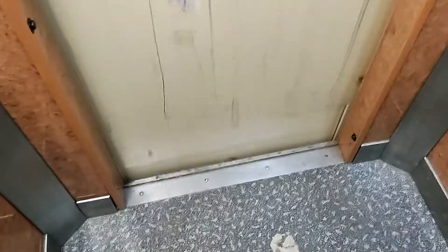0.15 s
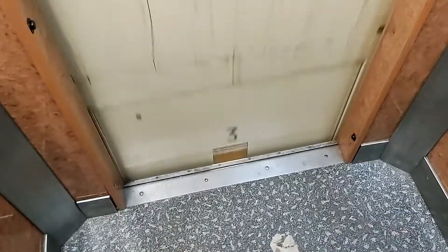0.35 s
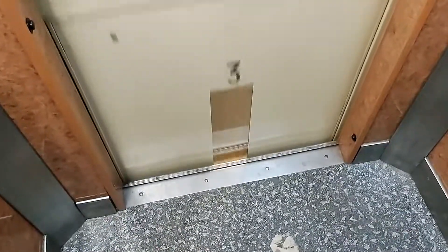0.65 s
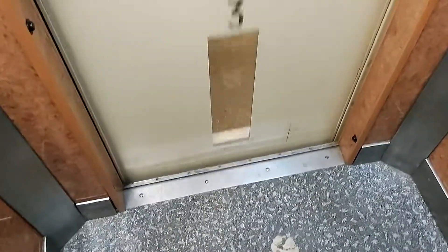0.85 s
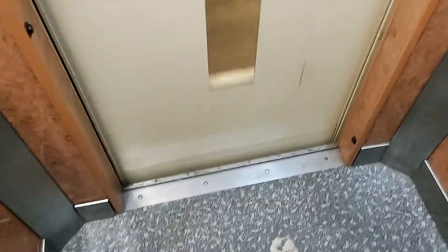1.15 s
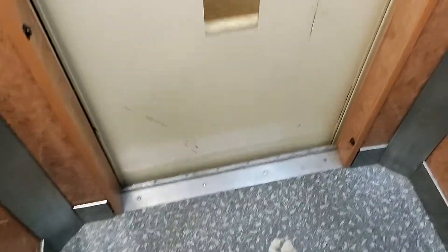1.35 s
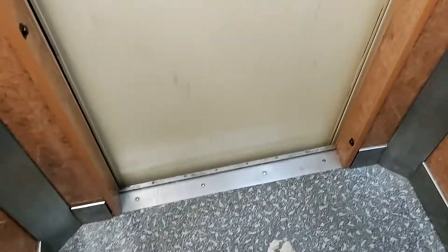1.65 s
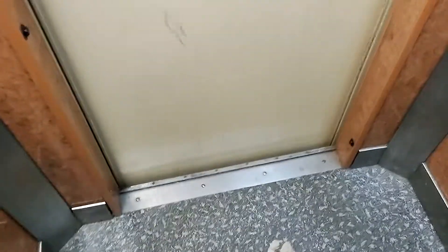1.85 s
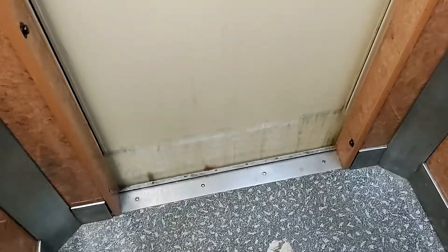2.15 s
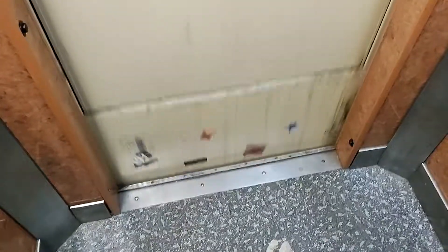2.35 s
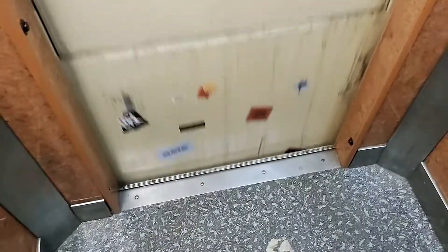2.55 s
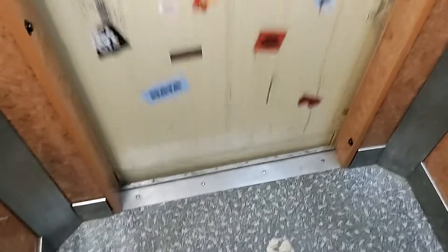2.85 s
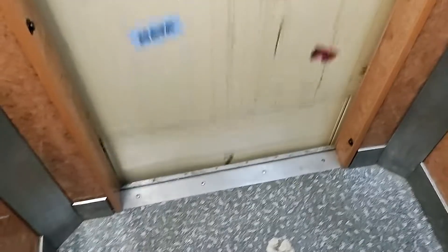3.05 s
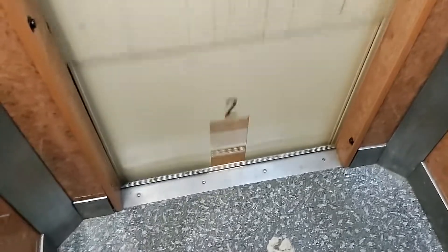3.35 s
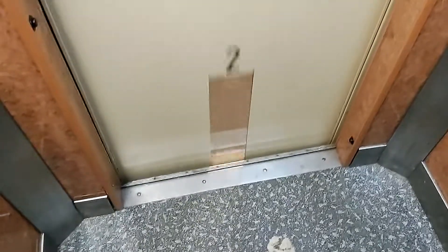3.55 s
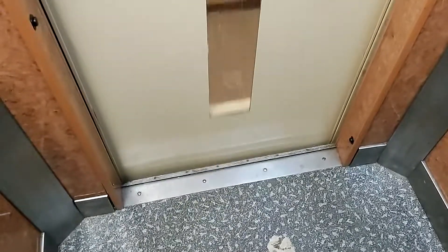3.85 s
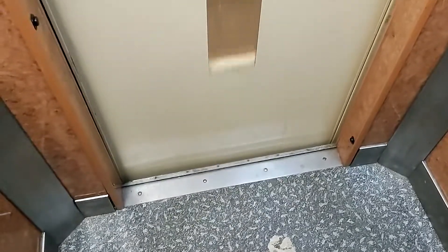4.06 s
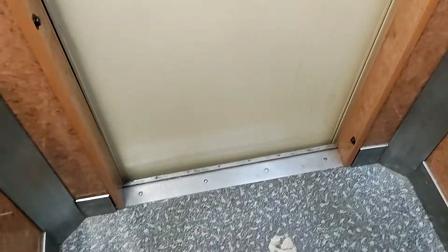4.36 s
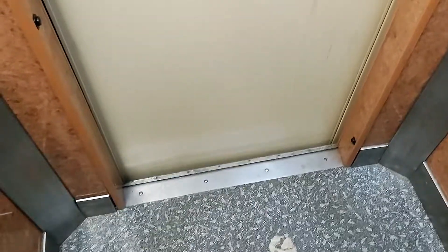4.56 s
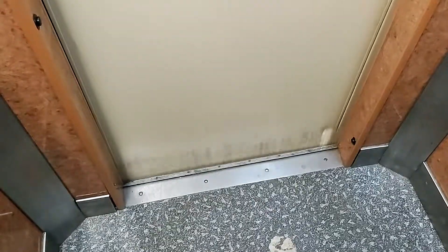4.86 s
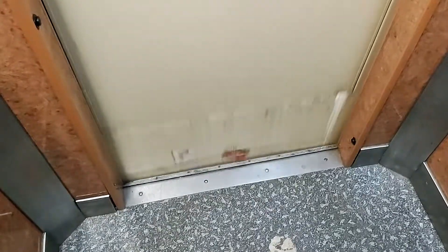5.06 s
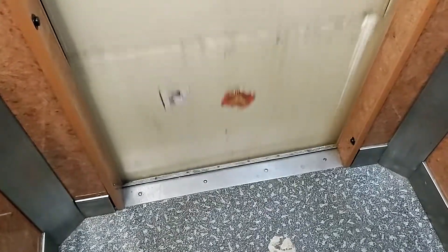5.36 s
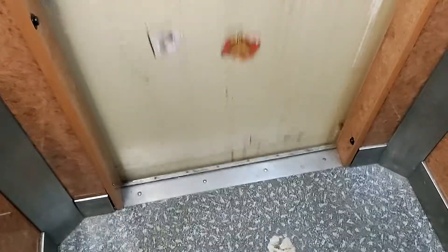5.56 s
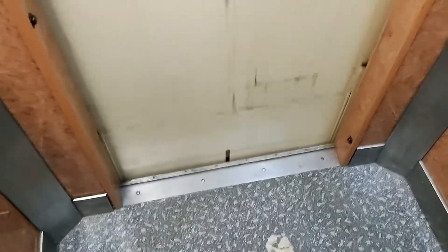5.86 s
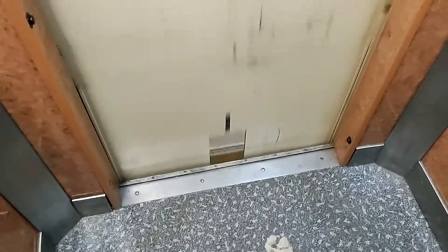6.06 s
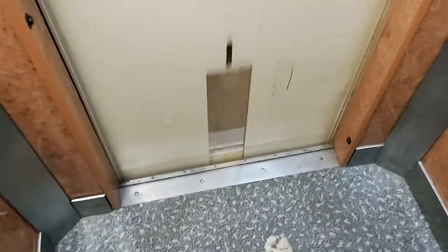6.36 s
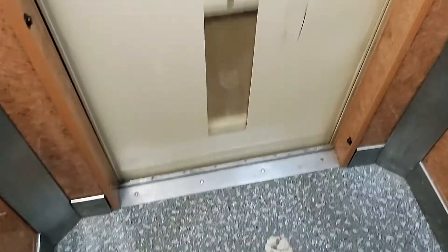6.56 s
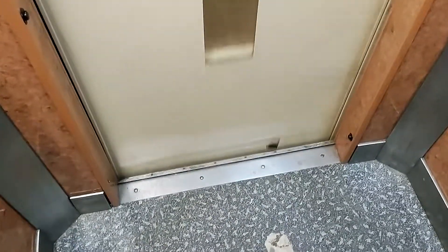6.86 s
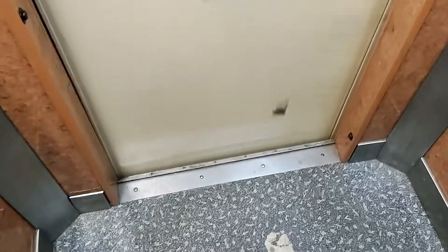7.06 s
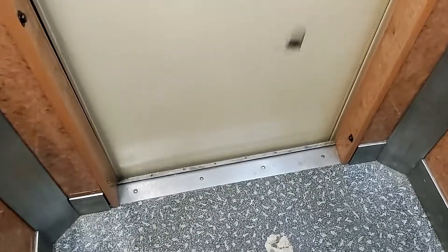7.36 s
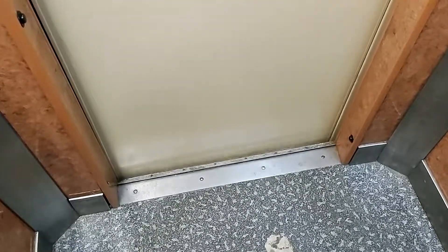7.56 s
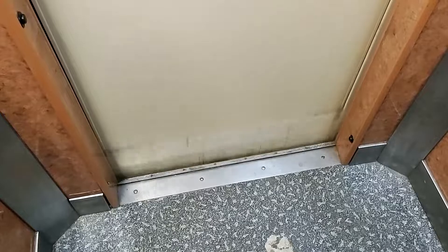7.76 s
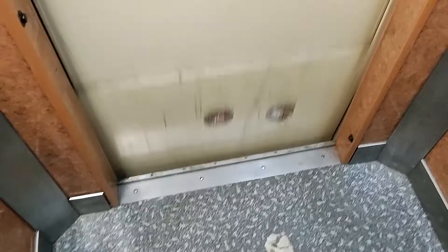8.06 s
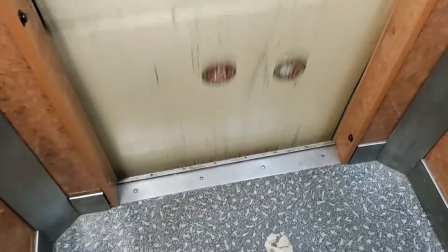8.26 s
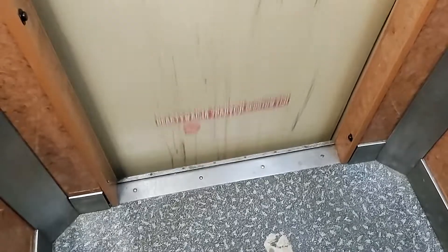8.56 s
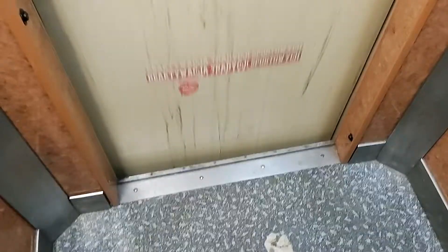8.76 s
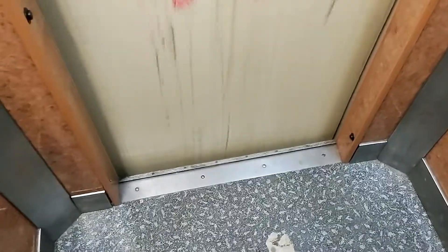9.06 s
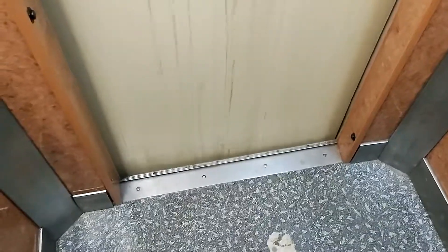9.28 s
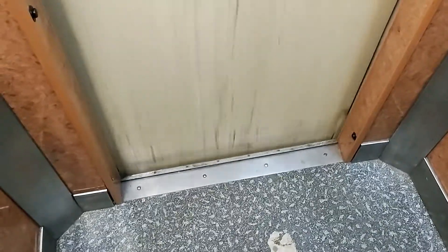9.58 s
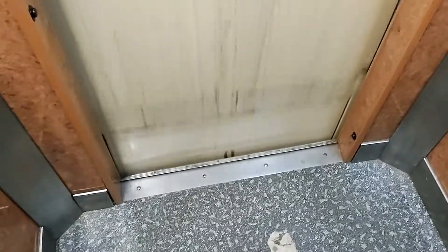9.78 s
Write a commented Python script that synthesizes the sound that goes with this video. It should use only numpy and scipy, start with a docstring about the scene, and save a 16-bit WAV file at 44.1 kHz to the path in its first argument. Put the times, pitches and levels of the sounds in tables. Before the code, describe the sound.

An old passenger lift is travelling throughout, heard close from inside the car: a low, slightly wavering motor hum, a soft rumble and a faint hiss from the rails. Over this, door gear knocks against the passing landings, each blow rattling, ringing the panels and echoing briefly in the shaft. One loud knock comes at 0.4 seconds, followed by light, scattered taps and a faint, thin whine from the rails around 1 to 2.5 seconds. Moderate knocks fall at 4.3 and 5.1 seconds, then loud ones at 5.6, 5.9, 7.5 and 7.8. Faint, short scrapes slide by between 7.3 and 8.4 seconds, ending with a small click. From 8.7 seconds comes the busiest part, a rapid run of loud clattering blows. Around 9.3 seconds a hollow door panel is struck and briefly scraped, and duller thuds continue until nearly 10 seconds.

```python
"""Door gear knocks, scrapes and clatters against each landing as an old lift car runs down its shaft.
Every blow rings the door panels, thumps the car wall and echoes on in the shaft. At the last landing
a hollow door leaf is struck and scraped. Underneath, the geared motor hums through ropes and rails,
and the guide shoes that hold the car on its rails rumble and hiss."""
import sys
import numpy as np
from scipy import signal
from scipy.io import wavfile

SR = 44100
rng = np.random.default_rng(int(sys.argv[2]) if len(sys.argv) > 2 else 0)


def generate_wav(sig):
    """Save sig (samples, or channels by samples) to the path in sys.argv[1] as 16-bit PCM at SR."""
    pcm = np.round(np.clip(np.atleast_2d(sig).T, -1, 1) * 32767).astype(np.int16)
    wavfile.write(sys.argv[1], SR, pcm)


N = 437472

# blows of the door gear: (time [s], level [dB], body [dB], treble [dB], fade time [s], contact time [s])
KNOCKS = [(0.084, -51.5, -2, -29, .14, .016), (0.3142, -40, -6.5, -11.5, .11, .018),
          (0.4337, -21.5, -7.5, -17.5, 0.35, 0.01), (0.9794, -51, 2, -26, .34, 0.061),
          (1.0789, -47.5, -2, -15, .095, 0.0085), (2.1581, -43, -0.5, -28, 0.12, 0.015),
          (2.7044, -42, -2, -34, 0.16, .012), (2.989, -51.5, 4, -25, .2, 0.019),
          (3.021, -49.5, 0, -24, 0.16, .02), (3.4768, -43, -4.5, -30, .19, 0.02),
          (3.532, -47, -7, -8.5, .15, .013), (4.008, -52, 1, -39, .08, .012),
          (4.2699, -32, -7.5, -44, 0.16, .013), (4.327, -32.5, -14, -15.5, 0.25, 0.011),
          (4.4359, -43.5, -0.5, -47, 0.11, 0.013), (4.621, -50, 0, -32, .18, .016),
          (4.6682, -43, -1.5, -39, .11, 0.035), (4.696, -42, -18, -9, .13, 0.019),
          (5.1286, -33, -6.5, -24, .11, 0.017), (5.419, -47, -2, -23, 0.12, 0.021),
          (5.5115, -51, 7, -27, .08, .0097), (5.6144, -36, 0, -8.5, .15, .023),
          (5.6304, -18.5, -4, -20.5, 0.29, 0.0028), (5.863, -29.5, -8, -14, .15, .011),
          (5.8862, -18.5, -5, -20.5, 0.22, 0.013), (6.249, -47, 1.5, -46, 0.083, 0.017),
          (7.215, -49, 4, -34, .088, .0084), (7.3596, -39, -12, -11, .12, 0.013),
          (7.5356, -41, -5, -7, .18, .02), (7.5521, -20, -7, -16.5, 0.38, 0.014),
          (7.822, -31.5, -8, -12, .2, 0.05), (7.8491, -17.5, -6, -18.5, 0.37, 0.021),
          (8.016, -33, -8, -12, 0.13, 0.008), (8.0847, -30.5, -6.5, -12.5, 0.12, 0.008),
          (8.464, -38.5, -6, -33, .14, 0.022), (8.478, -39, -17, -14, .18, .016),
          (8.51, -40.5, -14, -28, 0.13, .015), (8.6299, -36, -9, -21, .1, .0091),
          (8.7346, -21.5, -8, -20.5, 0.53, 0.021), (8.786, -21.5, -8, -30, 0.13, .011),
          (8.8799, -18, -6.5, -23.5, 0.14, 0.017), (9.019, -17, -8.5, -23, 0.22, .012),
          (9.1277, -17.5, -7.5, -26, 0.17, 0.014), (9.183, -18.5, -5.5, -34, 0.33, 0.021),
          (9.330, -18.5, 1, -55, 0.26, 0.05), (9.3847, -19, -15, -49, 0.22, 0.027),
          (9.43, -16, -5.5, -28.5, 0.29, 0.015), (9.621, -33, 8.5, -56, 0.55, 0.038),
          (9.6794, -37, 8, -40, .15, .018), (9.7625, -23.5, 2.5, -38, .32, 0.022),
          (9.829, -29.5, -2.5, -37, 0.57, .016)]
# basic tone colour of a blow: (frequency [Hz], level [dB])
BLOW_SPECTRUM = [(88, -33), (150, -14.5), (466, -8.5), (534, -14.5), (589, -6.5), (979, -5), (1080, -1.5),
                 (1450, -9), (1660, -3.5), (2400, -8), (5910, -30), (13200, -46.5), (16000, -53)]
# how alike left and right sound: (frequency [Hz], likeness [-1 to 1])
LIKENESS = [(60, 0.99), (100, 1), (160, 0.61), (240, 0.57), (340, 0.96), (550, 0.51), (900, -0.18),
            (1400, -0.3), (2500, 0.03), (7000, -0.057)]
# where hum and noise sit between the ears: (frequency [Hz], left over right [dB])
BALANCE = [(60, 0.0), (180, 1.5), (550, 1.5), (1650, -0.5), (4970, -2), (15000, 0.5)]


def door_knocks(bands, rattle):
    """Door gear hits the landings: each blow is a rattling burst of noise that rings the panels."""
    bursts = sum(from_db(at_hz(BLOW_SPECTRUM, hz)) * blow_envelope(hz) * rattle * noise
                 for hz, noise in bands if hz > 140)
    bursts = bursts / band_rms(BLOW_SPECTRUM, 1400, 3500)
    return 0.79 * bursts + door_panels(bursts)


def blow_envelope(hz):
    """Loudness of the blows over time at one pitch: a crack, a fading burst, then the shaft's echo."""
    # echo of the shaft: (frequency [Hz], time to fade by 60 dB [s])
    shaft_fade = [(150, 0.23), (400, 0.44), (1000, 0.54), (2800, 0.51), (7000, 0.24), (15000, 0.31)]
    # where the blows sit between the ears: (frequency [Hz], left over right [dB])
    blow_balance = [(300, -0.5), (1000, -.5), (4000, -3.5), (9000, -8.5), (15000, -6.5)]
    step = 32  # samples between points of the curve
    start, fade_s, contact_s = np.transpose(KNOCKS)[[0, 4, 5], :, None]
    points = np.ceil(start * SR / step).astype(int) + np.arange(SR // step)  # one second per blow
    age = points * step / SR - start
    slower = (1700 / hz) ** 0.18  # bass sets in later and lasts longer
    swell = (1 - np.exp(-age / (0.13 * contact_s * slower ** 3 + 1e-4))) ** 2  # long contacts start softly
    hold_s = contact_s * min(1, (2500 / hz) ** 0.44)  # treble fades before the parts let go
    fading_for = np.maximum(age - hold_s, 0)
    crack = from_db(2 * 9.5) * (hz / 8000) * 1e-6 ** (age / 0.023)  # in power: dB doubled, 1e-6 is -60 dB
    burst = swell * 1e-6 ** (fading_for / (fade_s * slower + 0.0008))
    echo_db = -9.5 + 3.5 * np.log2(hz / 1700)
    echo = swell * from_db(2 * echo_db) * 1e-6 ** (fading_for / at_hz(shaft_fade, hz))
    strength = from_db(2 * (blow_db(hz)[:, None] - 6.5 + 0.79 * rng.standard_normal(start.shape)))
    count = (N + SR) // step + 2
    power = np.bincount(points.ravel(), (strength * (crack + burst + echo)).ravel(), count)
    return pan(at_hz(blow_balance, hz)) * np.interp(np.arange(N) / step, np.arange(count), np.sqrt(power))


def blow_db(hz):
    """Level of every blow at one pitch: its body and treble make it duller or brighter than usual."""
    # bass, body, middle, rasp and treble of a usual blow: (frequency [Hz], level [dB])
    usual_blow = [(330, 1), (880, -1), (2200, 6), (4200, -12), (8800, -17)]
    db, body_db, treble_db = np.transpose(KNOCKS)[1:4]
    bass_db = -1 + 0.33 * body_db
    rasp_db = -11.5 + 0.27 * treble_db - 0.17 * body_db
    anchor_hz, usual_db = np.transpose(usual_blow)
    shares = [np.interp(np.log(hz), np.log(anchor_hz), row) for row in np.eye(len(anchor_hz))]
    shares[-1] += 0.98 * max(np.log(hz / anchor_hz[-1]), 0)  # the treble trend goes on upwards
    own_db = [bass_db, body_db, 0, rasp_db, treble_db]
    return db + sum(share * (own - usual) for share, own, usual in zip(shares, own_db, usual_db))


def door_panels(bursts):
    """The panels ring at their own pitches, struck by each first contact and shaken by the bursts."""
    # ringing pitches of the panels: (frequency [Hz], width [Hz], level [dB])
    panel_modes = [(217.2, 7.6, 1.5), (246.3, 6.9, 8), (312.6, 10.8, 5.5), (332, 13, -4), (382.5, 27, 1),
                   (471, 18, 2.5), (606.4, 15, -0.5), (898, 3.3, -8), (1077.5, 26, -4.5), (1310, 4.3, -6),
                   (1702, 30, -4.5), (1970, 17, -5.5), (2795, 8.8, -5), (4640, 29, -20), (5960, 25, -5),
                   (9400, 67, -29)]
    start, _, body_db = np.transpose(KNOCKS)[:3]
    hollow_db = 0.77 * (body_db + 5)  # blows with much body land on the open panel
    struck = np.zeros((2, N))
    for hz, width, db in panel_modes:
        strike_db = blow_db(hz) + hollow_db + at_hz(BLOW_SPECTRUM, max(hz, 900)) - 14.5
        strike_db += 0.78 * rng.standard_normal(len(start))
        swing_at = np.round(start * SR).astype(int) + round(3.505 / hz * SR)  # a big panel is slow to swing
        clicks = np.full(N, 1e-18)
        clicks[swing_at] = from_db(strike_db + db) * SR / (2 * np.pi * width)
        contact = resonate(clicks, hz, 0.51 * hz)  # softer for lower pitches
        ring = resonate(contact, hz, width)
        right_delay = np.arccos(at_hz(LIKENESS, hz)) / (2 * np.pi * hz) * SR
        struck += [ring, np.roll(ring, round(right_delay))]
    return struck + from_db(6) * resonances(bursts, panel_modes)


def wall_thump():
    """The car wall answers each blow with a short, low push about 8 ms later."""
    start, db = np.transpose(KNOCKS)[:2]
    thump_db = db - 8.5 + 2.8 * rng.standard_normal(len(start))
    return soft_ring(start + 0.00802, thump_db, hz=299.6, width=74)


def door_leaf():
    """A hollow door leaf rings under soft thuds and is scraped once."""
    # thuds on the leaf: (time [s], level [dB])
    thuds = [(9.328, -23), (9.441, -31), (9.64, -35.5), (9.758, -25)]
    # ringing pitches of the leaf: (frequency [Hz], width [Hz], level [dB])
    leaf_modes = [(130.5, 25, -5), (346, 30, -5), (635, 28, -5), (906, 29, 1), (1318, 34, -0.5),
                  (1645, 30, -9)]
    start, thud_db = np.transpose(thuds)
    ring = sum(soft_ring(start, thud_db + db, hz, width) for hz, width, db in leaf_modes)
    scrape_start_s, scrape_length_s = 9.335, 0.14
    stroke_times = scrape_start_s + np.array([0, 0.2, 0.6, 1]) * scrape_length_s
    stroke = np.interp(np.arange(N) / SR, stroke_times, [0.0021, 1, 0.72, 0])
    friction = from_db(-22) * stroke * rng.standard_normal((2, N)) + 1e-18
    return pan(-0.5) * (ring + resonate_twice(friction, hz=3750, width=1040))


def cam_slides(bands, rattle):
    """A cam (a shaped metal guide) slides along the door gear in short, bright scrapes."""
    # slides of the cam: (time [s], length [s], level [dB])
    slides = [(7.31, 0.2, -63), (7.766, 0.064, -68), (7.98, .13, -62.5), (8.273, 0.16, -72.5)]
    # tone colour of the rubbing: (frequency [Hz], level [dB])
    spectrum = [(530, -44), (900, -9), (1470, -9), (1660, -2), (1810, -11), (2020, -2), (5350, -14),
                (6410, -11), (16000, -36)]
    # ringing pitches of the cam: (frequency [Hz], width [Hz], level [dB])
    cam_modes = [(1614, 50, 13), (2380, 120, -1), (8950, 150, 4)]
    attack_s, release_s = 0.012, 0.046
    t = np.arange(N) / SR
    strokes = sum(from_db(db) * np.interp(t - start, [0, attack_s, length, length + release_s], [0, 1, 1, 0])
                  for start, length, db in slides)
    friction = strokes * rattle * coloured(bands, spectrum, low=700) / band_rms(spectrum, 5000, 14000)
    return from_db([[-5], [-1.5]]) * (friction + resonances(friction, cam_modes))


def ticks():
    """Single clicks ring small, stiff parts close by."""
    # dry ticks: (time [s], level [dB], left over right [dB])
    hits = [(5.3534, -28.5, 20), (8.4324, -23, 10)]
    # ringing pitches of the parts: (frequency [Hz], width [Hz], level [dB])
    part_modes = [(4180, 590, -3), (5650, 300, -6), (2500, 600, 6.5)]
    clicks = np.full((2, N), 1e-18)
    for start, db, balance_db in hits:
        clicks[:, round(start * SR)] = from_db(db) * pan(balance_db)[:, 0]
    return resonances(clicks, part_modes)


def motor_hum():
    """The geared motor hums in wavering tones at whole multiples of its drive shaft's turning rate."""
    # main tones, picked up by the moving car's panels: (time [s], 3rd [dB], 6th [dB], 10th [dB])
    strong_levels = [(0.0, -46, -44.5, -51.5), (0.44, -60, -49, -49.5), (1.05, -35.5, -46.5, -46),
                     (1.24, -38.5, -64, -45), (1.6, -49, -45, -51), (1.71, -55, -68, -53),
                     (1.79, -49, -56, -53.5), (2.37, -67, -48, -54.5), (2.65, -43, -37.5, -38.5),
                     (2.85, -53, -50, -54), (3.15, -52, -39.5, -43.5), (3.89, -42.5, -46, -46),
                     (5.52, -46, -37, -41.5), (5.66, -45, -34, -46), (7.07, -53, -48, -53),
                     (8.76, -47, -37, -45.5), (9.04, -48, -37, -40), (9.15, -37, -42, -54),
                     (9.53, -41, -48, -35), (9.64, -50, -35.5, -46), (9.7, -39, -33.5, -32.5),
                     (9.92, -38.5, -48, -42)]
    # weak tones: (multiple of the turning rate)
    weak_multiples = [2, 4, 5, 7, 8, 9, 11, 13, 15, 20, 21]
    # the same weak tones: (level [dB])
    weak_levels = [-56.5, -55.5, -62.5, -82, -57, -62, -64.5, -72.5, -60.5, -67, -66.5]
    # a tone reaches the ears out of step: (frequency [Hz], phase added left and taken off right [rad])
    phase_shift = [(30, .01), (100, 0.036), (165, 0.18), (250, 0.41), (350, 0.31)]
    drive_hz = 16.36
    angle = 2 * np.pi * np.cumsum(drive_hz * (1 + 0.001794 * drift(0.89))) / SR
    strong = [(k, db + 2 * drift(3.5)) for k, db in zip([3, 6, 10], in_time(strong_levels))]
    weak = [(k, db + 3.5 * drift(4.6)) for k, db in zip(weak_multiples, weak_levels)]
    hum = np.zeros((2, N))
    for multiple, db in strong + weak:
        hz = multiple * drive_hz
        phase = multiple * angle + rng.uniform(0, 2 * np.pi) + np.array([[1], [-1]]) * at_hz(phase_shift, hz)
        hum += np.sqrt(2) * from_db(db) * pan(at_hz(BALANCE, hz)) * np.sin(phase)
    return hum


def guide_shoes(bands):
    """The shoes rumble, hiss and sing on the rails, louder while blows shake the car."""
    # the shoes along the ride: (time [s], rumble [dB], hiss [dB])
    ride_levels = [(0.0, -54, -62.5), (.7, -53.5, -59.5), (1.2, -50, -63), (1.8, -56, -62.5),
                   (3.2, -52, -64.5), (4.3, -52.5, -66.5), (5.3, -50.5, -64), (7.0, -54, -65),
                   (9.92, -51, -62)]
    # tone colour of the rumble: (frequency [Hz], level [dB])
    rumble_spectrum = [(12, -37), (20, -16), (76, 2.5), (98, 2.5), (135, -5.5), (172, 4.5), (215, -7.5),
                       (281, -8), (330, -6.5), (433, -17.5), (595, -21), (698, -32), (900, -35.5),
                       (1170, -79), (1980, -120)]
    # tone colour of the hiss: (frequency [Hz], level [dB])
    hiss_spectrum = [(290, -33), (500, -3.5), (588, -5), (733, -8.5), (805, -5.5), (1060, -5.5),
                     (2180, -9.5), (2370, 3), (2570, -17), (4750, -21.5), (8000, -36.5), (10400, -78),
                     (17600, -120)]
    # ringing pitches of a shoe: (frequency [Hz], width [Hz], level [dB])
    shoe_modes = [(677, 15, -45), (2020, 27, -21), (2414, 14, -9.5), (4130, 360, -20), (4850, 46, -8)]
    # how strongly the shoe sings: (time [s], gain [dB])
    singing = [(0, 1), (1.2, 14), (2.4, 17), (2.7, -26), (9.92, -10)]
    sway_db = drift(1.64)  # all bands sway together, and each also flickers alone
    uneven = [(hz, from_db(sway_db + 2.27 * drift(14.2)) * noise) for hz, noise in bands]
    rumble = coloured(uneven, rumble_spectrum, high=1500) / band_rms(rumble_spectrum, 180, 500)
    hiss = coloured(uneven, hiss_spectrum, low=300, high=11000) / band_rms(hiss_spectrum, 1000, 5000)
    hiss += from_db(in_time(singing)[0]) * resonances(hiss, shoe_modes)
    rumble_db, hiss_db = in_time(ride_levels)
    shake = car_shake()
    rumble_gain = np.hypot(from_db(rumble_db), from_db(-29.5) * shake)
    hiss_gain = np.hypot(from_db(hiss_db), from_db(-26.5) * shake)
    return rumble_gain * rumble + hiss_gain * hiss


def car_shake():
    """How hard the car shakes: each blow adds power that swells, then dies away."""
    rise_s, fade_s = 0.028, 0.94
    start, db = np.transpose(KNOCKS)[:2, :, None]
    t = np.arange(0, N, 256) / SR
    age = np.maximum(t - start, 0)
    power = from_db(2 * db) * (1 - np.exp(-age / rise_s)) ** 2 * 1e-6 ** (age / fade_s)
    return np.interp(np.arange(N) / SR, t, np.sqrt(power.sum(axis=0)))


def faint_hiss(bands):
    """A steady, high hiss lies behind everything."""
    # tone colour of this hiss: (frequency [Hz], level [dB])
    spectrum = [(3000, -13), (5000, -4.5), (8000, 3.5), (12000, 4), (16000, 3)]
    return from_db(-72.5) * rms_one(coloured(bands, spectrum, low=2500))


def noise_bands():
    """Stereo noise in bands a third of an octave wide, each with its centre frequency."""
    edges = np.append(22 * 2 ** (np.arange(29) / 3), 18000)
    white = rng.standard_normal((2, 2, N))
    for k, (low, high) in enumerate(zip(edges, edges[1:])):
        band_filter = signal.butter(2, [low, high], "band", fs=SR, output="sos")
        mid, side = signal.sosfilt(band_filter, white[k % 2])
        hz = np.sqrt(low * high)
        alike = at_hz(LIKENESS, hz)
        yield hz, np.sqrt(1 + alike) * mid + np.sqrt(1 - alike) * side * [[1], [-1]]


def coloured(bands, spectrum, low=0, high=SR / 2):
    """Mix the bands between low and high Hz into noise with a given tone colour."""
    return sum(from_db(at_hz(spectrum, hz)) * pan(at_hz(BALANCE, hz)) * noise
               for hz, noise in bands if low < hz < high)


def band_rms(spectrum, low, high):
    """Average strength, between low and high Hz, of white noise given this tone colour."""
    return np.sqrt(np.sum(from_db(2 * at_hz(spectrum, np.arange(low, high)))) / (SR / 2))


def resonate(x, hz, width):
    """Let a sound ring at one pitch; the smaller the width, the longer the ring."""
    r = np.exp(-np.pi * max(width, 2) / SR)
    feedback = [1, -2 * r * np.cos(2 * np.pi * hz / SR), r * r]
    return signal.lfilter(np.array([1, 0, -1]) * (1 - r * r) / 2, feedback, x)


def resonate_twice(x, hz, width):
    """Two like resonances in a row, so the ring swells before it fades."""
    return resonate(resonate(x, hz, width), hz, width)


def resonances(x, modes):
    """Let a sound ring at several pitches at once."""
    return sum(from_db(db) * resonate(x, hz, width) for hz, width, db in modes)


def soft_ring(times, peak_db, hz, width):
    """Soft hits, each swelling to its peak level at one pitch."""
    clicks = np.full(N, 1e-18)
    clicks[(times * SR).astype(int)] = from_db(peak_db) * np.e * SR / (2 * np.pi * width)
    return resonate_twice(clicks, hz, width)


def drift(rate_hz):
    """A smooth random wobble of typical size 1."""
    r = np.exp(-80 * np.pi * rate_hz / SR)
    slow = signal.lfilter([1], [1, -2 * r, r * r], rng.standard_normal(N // 40 + 2002))[2000:]
    return np.interp(np.arange(N) / 40, np.arange(len(slow)), rms_one(slow))


def in_time(rows):
    """Turn a table over time into one curve per column, with a value at every sample."""
    times, *columns = np.transpose(rows)
    return [np.interp(np.arange(N) / SR, times, column) for column in columns]


def at_hz(rows, hz):
    """Read a table at one frequency, with octaves evenly spaced."""
    frequencies, values = np.transpose(rows)
    return np.interp(np.log(hz), np.log(frequencies), values)


def pan(db):
    """Left and right gains, the left louder by db."""
    return from_db([[db / 2], [-db / 2]])


def from_db(db):
    """Turn decibels into a gain."""
    return 10 ** (np.asarray(db) / 20)


def rms_one(x):
    """Scale a signal to an average strength (rms) of 1."""
    return x / np.sqrt(np.mean(x ** 2) + 1e-20)


def scene():
    """The clatter of the doors over the hum and rumble of the ride."""
    bands = list(noise_bands())
    rattle = from_db(0.64 * drift(190))  # fast flicker shared by knocks and slides
    clatter = door_knocks(bands, rattle) + wall_thump() + door_leaf() + cam_slides(bands, rattle) + ticks()
    return clatter + motor_hum() + guide_shoes(bands) + faint_hiss(bands)


def record(dry):
    """Cut the treble above 16 kHz."""
    return signal.sosfilt(signal.cheby2(20, 70, 16000, fs=SR, output="sos"), dry)


dry = scene()
out = record(dry)
generate_wav(out)
```